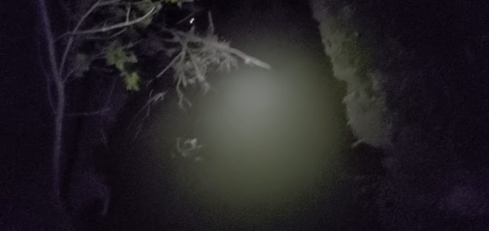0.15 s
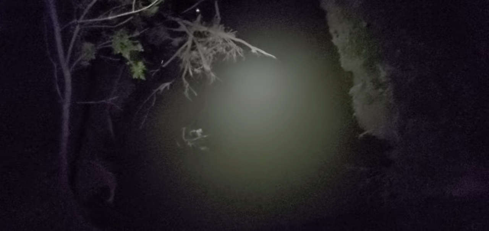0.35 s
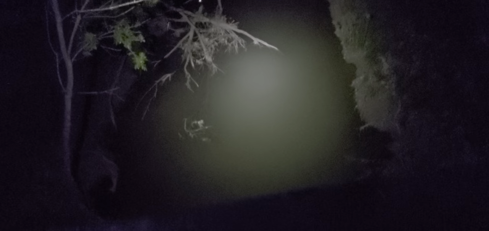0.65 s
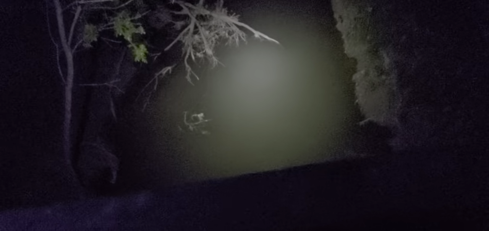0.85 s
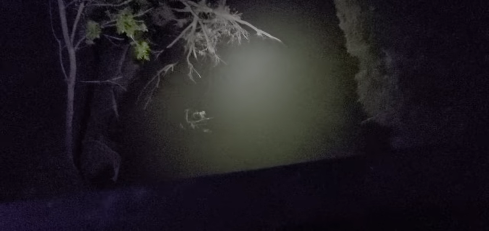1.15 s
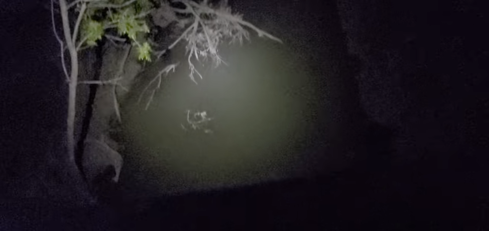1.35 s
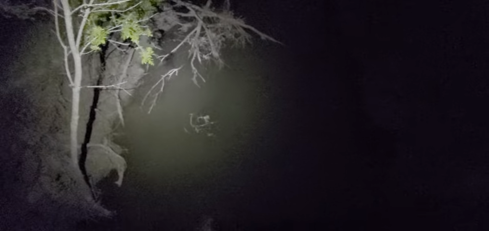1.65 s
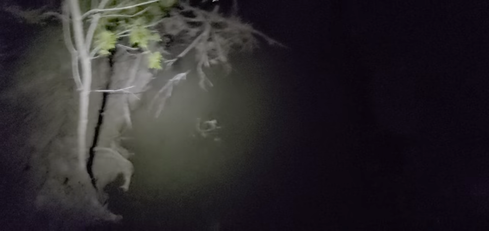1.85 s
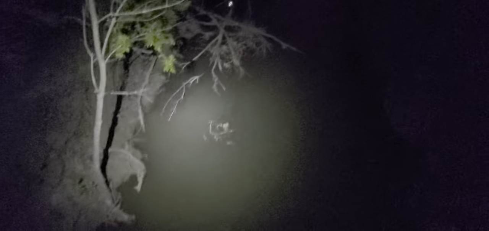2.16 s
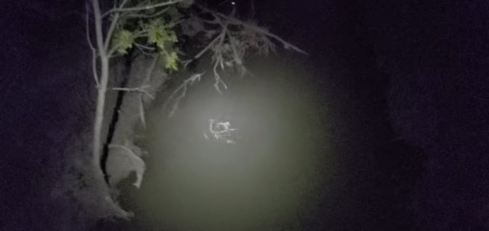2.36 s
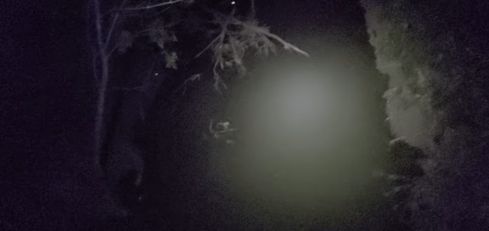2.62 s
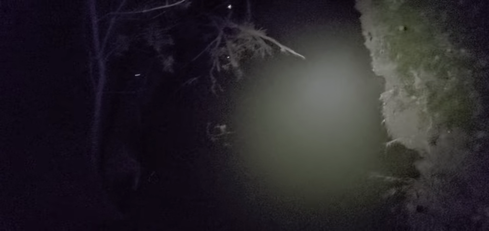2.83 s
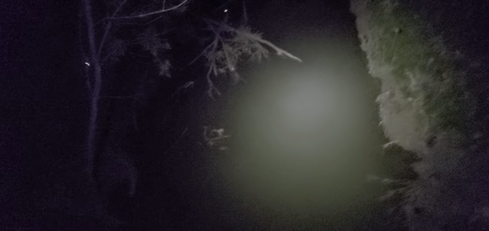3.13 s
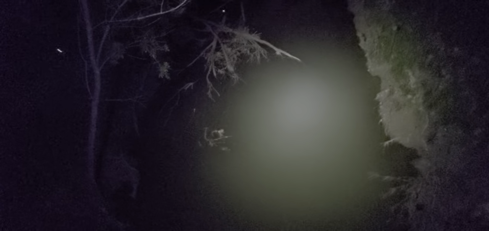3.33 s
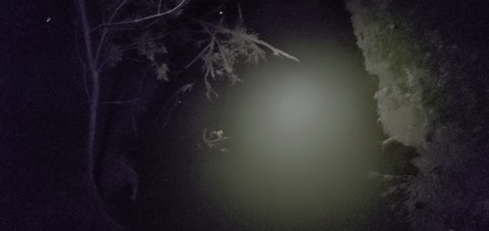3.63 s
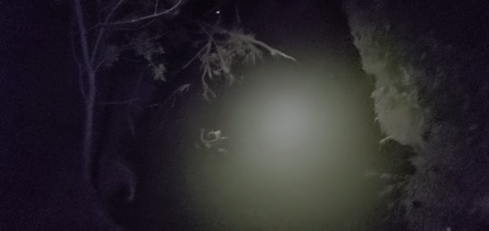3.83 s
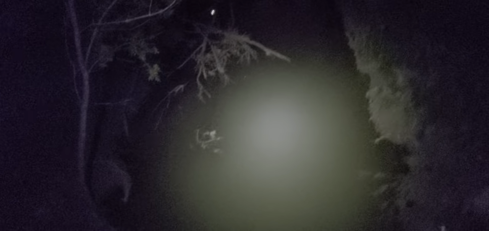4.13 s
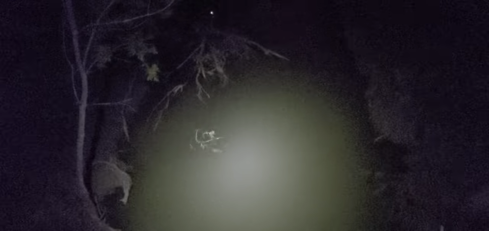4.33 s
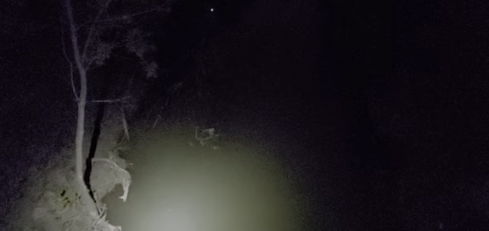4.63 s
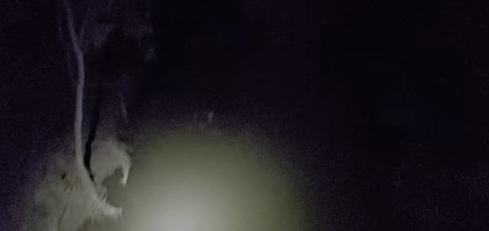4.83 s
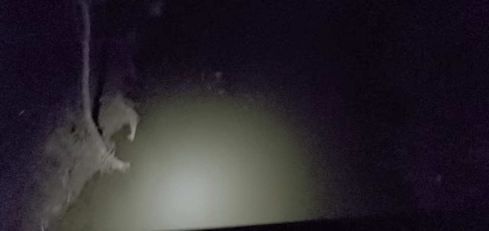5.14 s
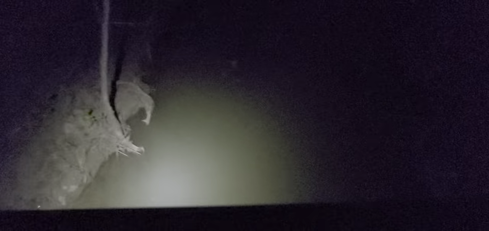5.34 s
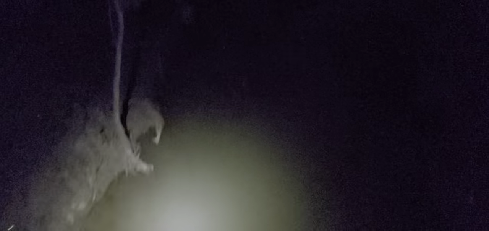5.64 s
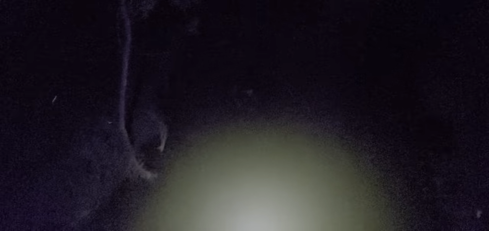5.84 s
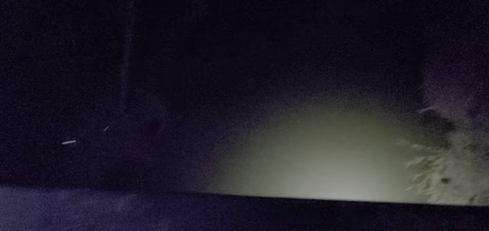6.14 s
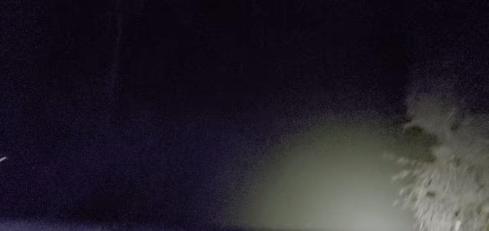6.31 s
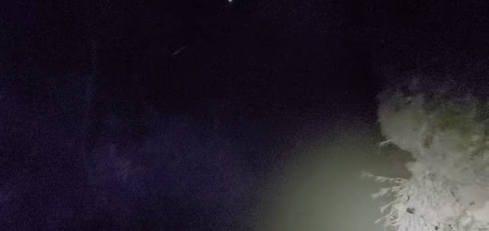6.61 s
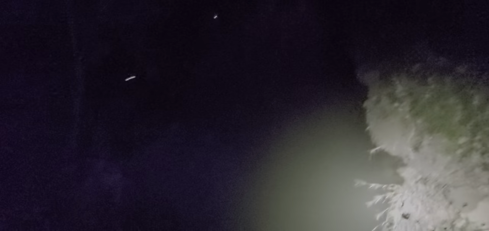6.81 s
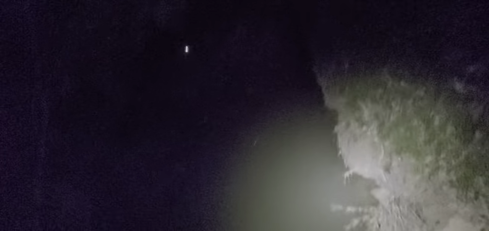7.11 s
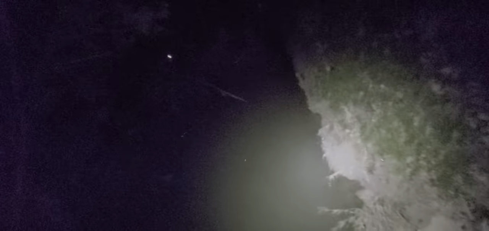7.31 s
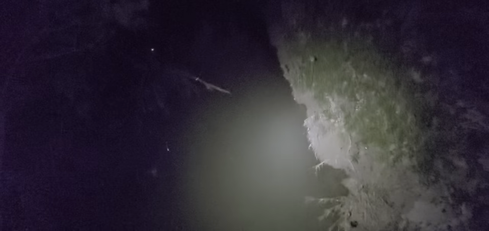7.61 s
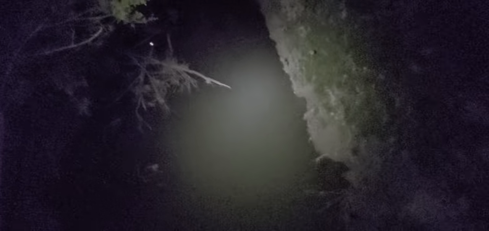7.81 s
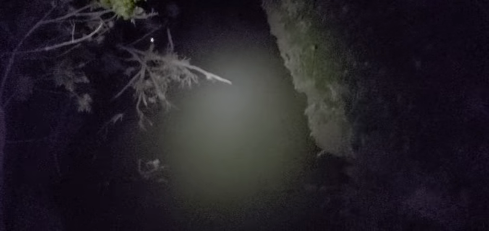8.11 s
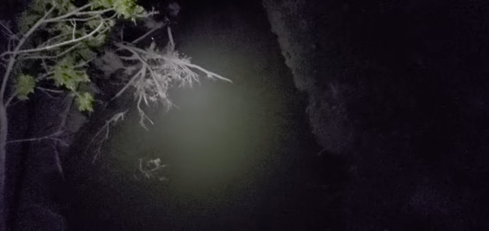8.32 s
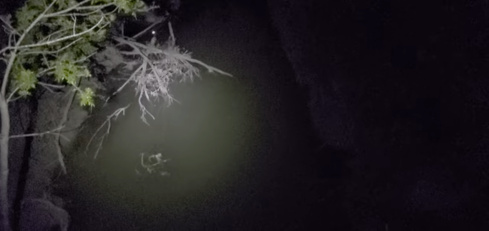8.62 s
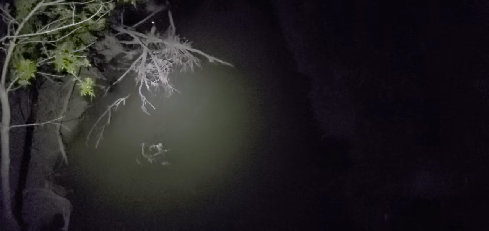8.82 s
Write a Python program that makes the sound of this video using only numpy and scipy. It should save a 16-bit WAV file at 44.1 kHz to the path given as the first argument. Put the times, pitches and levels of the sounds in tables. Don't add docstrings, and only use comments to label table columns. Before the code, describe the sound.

Night insects and small frogs chorus densely by a dark creek above faint low rumble, while a hand-held camera ticks, scrapes and clicks sharply.

```python
import sys
import numpy as np
from scipy import signal
from scipy.fft import rfft, irfft, next_fast_len
from scipy.io import wavfile
from scipy.ndimage import uniform_filter1d, map_coordinates

SR = 44100
rng = np.random.default_rng(int(sys.argv[2]) if len(sys.argv) > 2 else 0)


def log_audio(samples):
    frames = np.atleast_2d(samples).T
    limited = np.clip(frames, -1, 1)
    pcm = np.round(limited * 32767).astype(np.int16)
    wavfile.write(sys.argv[1], SR, pcm)


def makeup_ratio(level_db):
    decades = np.asarray(level_db, float) / 20
    return 10 ** decades


N = 395136

# first stroke in seconds, last stroke in seconds.
CRICKET_RUNS = [(0.0139, 0.0139), (0.0558, 0.0724), (0.0866, 0.0866), (0.1019, 0.1943), (0.2256, 0.3202),
                (0.3537, 0.3892), (0.4224, 0.4224), (0.4371, 0.745), (0.7767, 0.7767), (0.8068, 0.8068),
                (0.8467, 0.8865), (0.9164, 0.9739), (1.0019, 1.0407), (1.071, 1.1324), (1.1478, 1.1674),
                (1.1826, 1.221), (1.2488, 1.2703), (1.2986, 1.6344), (1.6605, 1.6765), (1.7293, 1.7293),
                (1.7614, 1.8009), (1.8391, 1.9147), (1.9451, 1.9451), (1.9731, 2.3394), (2.3696, 2.5442),
                (2.5764, 2.6158), (2.6307, 2.6523), (2.6822, 2.7004), (2.7322, 2.7703), (2.8004, 2.8183),
                (2.8524, 2.9701), (3.0013, 3.041), (3.0709, 3.1667), (3.197, 3.2346), (3.265, 3.265),
                (3.3075, 3.3075), (3.3361, 3.377), (3.4041, 3.6785), (3.7105, 3.7281), (3.7438, 3.7646),
                (3.8056, 3.8238), (3.8492, 3.8695), (3.884, 3.884), (3.9088, 4.0644), (4.0952, 4.1534),
                (4.183, 4.2201), (4.2505, 4.2702), (4.299, 4.3385), (4.3685, 4.4089), (4.4387, 4.4584),
                (4.487, 4.526), (4.5555, 4.654), (4.669, 4.6909), (4.705, 4.705),
                (4.7202, 4.8178), (4.8474, 4.8477), (4.8727, 4.8927), (4.9218, 4.9611),
                      (4.9885, 5.0321), (5.0642, 5.1427), (5.171, 5.2503), (5.2786, 5.2786),
                      (5.3038, 5.3217), (5.337, 5.4348), (5.4647, 5.507), (5.5387, 5.5821),
                      (5.6128, 5.6493), (5.686, 5.686), (5.7145, 5.7369), (5.7675, 5.7675), (5.798, 5.817),
                      (5.8478, 5.9635), (5.9951, 6.034), (6.059, 6.0598), (6.104, 6.184), (6.2146, 6.2523),
                      (6.2851, 6.4024), (6.431, 6.4542), (6.4943, 6.4943), (6.509, 6.6446),
                      (6.6774, 6.7718), (6.8096, 6.8482), (6.88, 6.8794), (6.9102, 6.9756),
                      (7.0056, 7.1366), (7.1655, 7.2044), (7.2484, 7.2484), (7.291, 7.3095),
                      (7.3401, 7.3401), (7.3788, 7.5194), (7.5461, 7.5461), (7.5788, 7.5788),
                      (7.6064, 7.6064), (7.6371, 7.7332), (7.7617, 7.8554), (7.8848, 7.9808),
                      (8.0102, 8.0479), (8.0767, 8.2292), (8.2611, 8.2986), (8.329, 8.3861),
                      (8.4191, 8.4584), (8.4846, 8.4846), (8.5195, 8.5195), (8.5431, 8.5833),
                      (8.6115, 8.6535), (8.6822, 8.7987), (8.8293, 8.8681), (8.896, 8.8967),
                      (8.9204, 8.9579)]
# time in seconds, level in dB, left over right in dB.
CRICKET_LEVEL = [(0, -57, -7), (1.66, -53, -5), (1.72, -70, -11), (1.82, -56, -6), (3.72, -54.5, -8.5),
                 (3.8, -66, -3), (3.93, -54.5, -7), (5, -56.5, -3.5), (5.9, -59.5, -17), (6.8, -58, -4),
                 (7.5, -49, -2), (7.58, -63, 1), (7.72, -52, 0), (8.96, -53, -2.5)]
STROKE_S = .0194

# start in seconds, peak in dB, pitch in Hz, low mode in dB.
FIRST_CALLS = [(0.0313, -46, 3560, -26), (0.1037, -55, 3600, -28), (0.17, -45.5, 3570, -20),
               (0.2473, -47.5, 3600, -17), (0.2843, -50, 3500, -16), (0.3691, -58, 3570, -20),
               (0.4439, -48, 3380, -23), (0.4978, -43.5, 3530, -14), (0.6619, -51, 3650, -15),
               (0.6943, -49, 3600, -9), (0.7297, -41, 3550, -17), (0.8056, -32, 3440, -13.5),
               (0.8719, -47, 3540, -22), (0.9158, -49, 3500, -26), (0.9542, -49, 3500, -16),
               (1.1024, -44, 3680, -13.5), (1.2027, -47.5, 3530, -21), (1.293, -41, 3490, -23),
               (1.3418, -45.5, 3640, -28), (1.4556, -44, 3570, -17), (1.4935, -46, 3620, -19),
               (1.5319, -49.5, 3600, -13), (1.6092, -41, 3470, -20), (1.7794, -49, 3600, -23),
               (1.8213, -44, 3660, -11.5), (1.926, -39, 3560, -21), (2.0213, -37, 3530, -22),
               (2.0602, -44, 3380, -19), (2.1146, -48, 3530, -19), (2.172, -51, 3620, -13),
               (2.2258, -43.5, 3420, -12.5), (2.3216, -41, 3500, -23), (2.4159, -49.5, 3330, -12),
               (2.5346, -56, 3560, -19), (2.5731, -46.5, 3610, -12), (2.6269, -52, 3440, -27),
               (2.6708, -42.5, 3510, -14), (2.7511, -48.5, 3480, -24), (2.8624, -52, 3390, -23),
               (2.9277, -43.5, 3400, -15), (3.0634, -35, 3530, -16), (3.2216, -42, 3500, -22),
               (3.3368, -45, 3470, -12.5), (3.4994, -42, 3470, -23), (3.5523, -48.5, 3460, -12),
               (3.6192, -48.5, 3500, -18), (3.7145, -61, 3540, -20), (3.7843, -43.5, 3630, -12.5),
               (3.9045, -41, 3550, -22), (4.0332, -42.5, 3480, -16)]
# start in seconds, peak in dB, pitch in Hz, low mode in
# dB.
MIDDLE_FROG_CALLS = [(4.1353, -41.5, 3540, -19.5), (4.2001, -45, 3510, -24), (4.2545, -44, 3720, -17),
                     (4.3014, -39, 3360, -19), (4.465, -40, 3550, -20), (4.5169, -46, 3440, -25),
                     (4.5623, -43.5, 3410, -23), (4.696, -45, 3430, -14), (4.7479, -34, 3530, -12.5),
                     (4.8506, -39, 3510, -17), (4.9594, -66, 3730, -19), (5.0337, -41, 3430, -20),
                     (5.0986, -41, 3460, -21), (5.1998, -44.5, 3550, -18), (5.2447, -49, 3580, -13),
                     (5.3455, -40, 3590, -14), (5.4687, -53, 3350, -17), (5.5316, -47.5, 3400, -22),
                     (5.6014, -57, 3440, -20), (5.6403, -40, 3570, -14), (5.7501, -47, 3590, -19),
                     (5.8708, -51, 3420, -24), (5.9082, -60, 3400, -17), (5.998, -44, 3610, -15),
                     (6.1681, -47, 3560, -14), (6.4834, -45, 3560, -14), (6.683, -48.5, 3770, -19),
                     (6.8157, -41.5, 3580, -15.5), (6.9169, -45.5, 3520, -14), (6.9908, -43.5, 3600, -27),
                     (7.11, -52.5, 3580, -20), (7.1968, -40, 3620, -25)]
# start in seconds, peak in dB, pitch in Hz, low mode in dB.
LAST_FROG_CALLS = [(7.3257, -45.5, 3670, -14), (7.4574, -44, 3630, -18), (7.6135, -41, 3570, -25),
                   (7.7617, -47, 3620, -23), (7.7956, -47, 3700, -16), (7.8615, -48, 3560, -19),
                   (7.9104, -46, 3580, -24), (8.0226, -50, 3640, -21), (8.059, -47, 3590, -19),
                   (8.1204, -41.5, 3580, -21), (8.2855, -48.5, 3580, -23), (8.3673, -45, 3570, -20),
                   (8.4836, -42.5, 3540, -21), (8.6287, -51, 3500, -25), (8.6632, -43.5, 3630, -26),
                   (8.7116, -52, 3530, -23), (8.7784, -47, 3450, -20), (8.8298, -44.5, 3560, -16)]
# time in seconds, level in dB, left over right in dB.
BANK_LEVEL = [
    (0.0, -62.5, -8),
    (1.65, -55, -7.0),
    (5.37, -57, -6),
    (6.29, -59.5, -2),
    (7.19, -53.5, -7),
    (7.83, -59.5, -0.5),
    (8.96, -57, -3),
]
# frequency in Hz, gain in dB.
VOCAL_SAC = [(1800, -30), (2500, -2), (3000, 1.5), (4100, 7.5), (5500, -26)]

# time in seconds, level in dB.
KATYDID_LEVEL = [
    (0, -71),
    (4.5, -71),
    (5.2, -71.5),
    (5.7, -77),
    (6.4, -76.5),
    (6.9, -67.5),
    (7.8, -73.5),
    (8.96, -74.5),
]
# share of the cycle, level in dB.
WING_SCRAPES = [
    (0, 8.5),
    (0.301, -6),
    (0.629, 7),
    (0.801, -10),
]
# frequency in Hz, gain in dB.
WING_MIRROR = [(8000, -5), (9500, 6.5), (10400, -1.5), (11000, 2.5), (11600, 2.5), (12200, -0.5),
               (13000, 4), (13600, -24)]
# frequency in Hz, width in Hz, level in dB.
WING_RESONANCES = [(9700, 250, -9), (10300, 160, -7), (10750, 200, -4), (11480, 210, -1),
                   (12100, 190, -5.5), (12650, 180, -4)]

# start in seconds, hold in seconds, body in dB, sheen in dB.
CLOTH_RUSTLES = [(1.565, .03, -85, -78), (1.835, 0.059, -68, -76), (2.09, .02, -68, -82),
                 (2.19, 0.12, -64.5, -83), (2.625, 0.048, -66, -66), (3.04, 0.037, -59.5, -70),
                 (3.225, 0.019, -63, -70), (3.3, 0.35, -71, -75), (3.625, 0.017, -65, -69),
                 (3.89, .04, -77, -77), (4.335, .03, -69, -86), (4.76, 0.14, -74, -87),
                 (6.05, .04, -78, -85), (6.7, 0.39, -78, -91), (7.12, 0.16, -71, -94),
                 (7.35, 0.21, -65.5, -86), (7.58, 0.26, -68.5, -87)]
# frequency in Hz, density in dB per Hz.
CLOTH_BODY = [(800, 1), (3000, -9.5), (6200, -2.5), (8000, -12), (11000, -22)]
# frequency in Hz, density in dB per Hz.
CLOTH_SHEEN = [(6000, -6), (9500, 2), (15500, 3)]
# start in seconds, hold in seconds, hiss in dB, scrape in dB.
THUMB_RUBS = [(.805, 0.0071, -81, -53.5), (1.835, 0.053, -91, -52), (1.93, 0.15, -71, -60.5),
              (4.77, 0.043, -76, -55), (4.885, 0.028, -61, -53.5), (5.25, 0.1, -60.5, -50.5),
              (5.39, 0.089, -47.5, -44), (5.52, 0.17, -63.5, -62), (5.75, 1.1, -71, -62.5),
              (6.04, 0.076, -66, -58), (6.64, 0.06, -60.5, -58), (6.765, .03, -70, -66),
              (7.15, 0.081, -53.5, -80), (7.28, 0.26, -58, -60), (7.25, 0.015, -57, -45.5),
              (7.335, 0.029, -48, -46), (7.42, 0.034, -54, -51.5), (7.52, 0.31, -60.5, -81),
              (7.83, 0.068, -70, -85), (7.635, 0.022, -67, -52.5), (8.515, 0.015, -63, -57)]
# frequency in Hz, density in dB per Hz.
SKIN_HISS = [(3000, 1.5), (7000, -12), (10500, -4), (12500, 0), (15500, -4)]
# frequency in Hz, density in dB per Hz.
THUMB_SCRAPE = [(60, 19), (150, 8.5), (500, -1), (1500, -8), (4000, -15.5), (8000, -29.5)]
# time in seconds, level in dB, pitch in Hz.
FIBRE_PRICKS = [(1.5449, -66, 12000), (2.105, -60, 11000), (2.222, -64, 11000), (4.7128, -60, 11000),
                (5.379, -51, 12600), (5.725, -71, 14000), (5.785, -67, 11500), (5.9995, -57.5, 9900),
                (6.059, -56, 9000), (6.068, -55.5, 10700), (6.178, -63, 9000), (7.914, -71, 13500)]
# share of the pitch, width in Hz, level in dB.
GRILLE_MODES = [(1, 2600, 2.5), (1.3, 2500, -6)]

# time in seconds, snap in dB, knock in dB, thump in dB, left over right in dB.
CASE_TICKS = [(0.6829, -84, -37, -46.5, -9), (0.805, -36, -27, -36, -34), (1.944, -45.5, -60, -44, -22),
              (2.0207, -41.5, -66, -49.5, -27), (3.0416, -63, -70, -64, 2), (3.222, -53, -71, -70, -13),
              (4.3263, -54, -68, -74, -14), (4.348, -52, -56, -50.5, -18), (4.713, -70, -58, -51.5, 0),
              (4.814, -66, -69, -48.5, -13), (4.8719, -54, -38, -41.5, -12), (5.3764, -70, -63, -38.5, -30),
              (6.1748, -73, -49, -68, 2.5), (6.6458, -71, -73, -44, -28), (6.7671, -57, -40, -62, -13),
              (7.247, -7.5, -24, -29, -46), (7.6401, -59, -38, -51.5, -21), (7.9912, -64, -41, -46, -26),
              (8.5176, -49, -58, -44.5, -23)]
# time in seconds, knock in dB.
GRIP_CREAKS = [
    (7.8008, -45),
    (7.8156, -43),
    (7.833, -55),
    (7.849, -43),
    (7.87, -47),
    (7.9066, -40.5),
]
# frequency in Hz, width in Hz, level in dB.
CASE_MODES = [(1160, 1360, 0), (2790, 4240, 5.5), (6550, 2600, -12.5), (11400, 3300, -5)]

# start in seconds, level in dB, pitch in Hz, length in
# seconds, left over right in dB.
GURGLES_AND_CALLS = [
    (1.813, -62.5, 1230, 0.075, 23),
    (1.821, -55.5, 540, 0.076, 9),
    (1.954, -48, 522, 0.052, 6),
    (1.95, -61, 780, 0.048, 5),
    (6.838, -73, 2290, 0.13, 2),
    (6.966, -76, 2320, 0.17, 0),
    (7.08, -70, 2300, 0.14, -2),
    (7.262, -71, 2320, 0.081, -6),
]

# time in seconds, level in dB.
TRAFFIC_LEVEL = [
    (0.0, -53.5),
    (3.77, -51.5),
    (7.29, -50.5),
    (8.96, -52.5),
]
# frequency in Hz, density in dB per Hz.
RUMBLE = [(25, -61), (46, -3), (95, -3.5), (150, -10), (378, -19), (800, -25), (2500, -43.5), (3250, -104)]
# frequency in Hz, likeness from 0 to 1.
RUMBLE_ALIKE = [(60, 0.91), (260, 1), (700, 0.39), (1400, 0.15), (2500, 0.063)]
# frequency in Hz, density in dB per Hz.
FAR_CHORUS = [(2000, -55), (2700, -35), (3500, -18), (4000, -32), (4500, 7), (5000, 0.5), (5600, -23.5),
              (6500, -88)]
# frequency in Hz, density in dB per Hz.
FAR_BUZZ = [(5400, -1), (6500, 8.5), (7500, 1), (8000, 4)]
# frequency in Hz, density in dB per Hz.
MICROPHONE_HISS = [(5000, -20), (7900, -14), (9000, 12), (15500, 23)]
RUMBLE_LAG_S = -20 / SR

TOP_HZ = 15780


def cricket():
    middles = stroke_times()
    chance = rng.standard_normal((len(middles), 3))
    t, length = np.arange(900) / SR, .0115
    start_hz = 4520 + 30 * chance[:, :1]
    fall = 480 * length / 3.16 * (t / length) ** 3.48
    phase = 2 * np.pi * (start_hz * t - fall) + 3 * chance[:, 1:2]
    swell = np.sin(np.pi * np.clip(t / length, 0, 1) ** 0.93).clip(0)
    tone = np.sin(phase) + makeup_ratio(-17) * np.sin(2 * phase)
    wing_strokes = makeup_ratio(0.84 * chance[:, 2:]) * swell * tone
    level_db, pan_db = curves(CRICKET_LEVEL)
    song = makeup_ratio(level_db - 7) * unit(placed(middles - length / 2, wing_strokes))
    return heard(song, pan_db, lag=.00003, wet_db=-0.15, t60=0.41)


def stroke_times():
    runs = CRICKET_RUNS
    return np.concatenate([np.linspace(a, b, round((b - a) / STROKE_S) + 1) for a, b in runs])


def frogs():
    level_db, pan_db = curves(BANK_LEVEL)
    count = 650
    chance = rng.random((count, 3))
    crowd_hz = 3620 - 450 * chance[:, 2] ** 2.2
    crowd = np.c_[chance[:, 0] * N / SR, 5 * chance[:, 1], crowd_hz, np.full(count, -19)]
    far = makeup_ratio(level_db - 8.5 + 1.8 * wobble(7)) * unit(rattles(crowd, spacing=.007, fade_db=1.5))
    calls = np.r_[FIRST_CALLS, MIDDLE_FROG_CALLS, LAST_FROG_CALLS]
    calls[:, 1] = np.minimum(calls[:, 1], -41)
    near = makeup_ratio(-5) * rattles(calls, spacing=0.0073, fade_db=1.36)
    near = heard(near, pan_db, lag=-.0001, wet_db=-4, t60=0.32)
    far = heard(far, pan_db, lag=-.00012, wet_db=4, t60=0.44)
    return filtered(near + far, lambda hz: makeup_ratio(along(VOCAL_SAC, hz)))


def rattles(calls, spacing, fade_db):
    s, db, hz, low_db = np.transpose(calls)[:, :, None]
    chance = rng.standard_normal((len(calls), 4, 8))
    order = np.arange(8)
    gaps = spacing * np.exp(.25 * chance[:, 0] + .15 * chance[:, 3, :1])
    starts = s + np.cumsum(gaps, axis=1) - gaps[:, :1]
    sizes = makeup_ratio(db + 2.36 * chance[:, 1] - fade_db * order)
    pitch = (hz * (1 + 0.021 * chance[:, 2] - 0.0015 * order)).reshape(-1, 1)
    t = np.arange(260) / SR
    low_gain = makeup_ratio(np.repeat(low_db, 8)[:, None] + 9)
    ring = np.sin(2 * np.pi * pitch * t)
    ring = ring + low_gain * np.sin(2 * np.pi * 0.853 * pitch * t)
    ring = ring + makeup_ratio(-12.5) * np.sin(2 * np.pi * 1.11 * pitch * t)
    pulse = (t / 0.001) * np.exp(1 - t / 0.0013)
    return placed(starts.ravel(), sizes.reshape(-1, 1) * pulse * ring)


def katydid():
    cycles, cycles_per_s = 620, 68.35
    share, db = np.transpose(WING_SCRAPES)
    starts = ((np.arange(cycles)[:, None] + share + .67) / cycles_per_s).ravel()
    chance = rng.standard_normal((len(starts), 2))
    t, length = np.arange(120) / SR, .0022
    phase = 2 * np.pi * (13200 * t - 4500 * t * t / length / 2) + 1.3 * chance[:, :1]
    swell = np.sin(np.pi * np.clip(t / length, 0, 1)) ** 0.1
    scrape = swell * makeup_ratio(-6 * t / length) * np.sin(phase)
    sizes = makeup_ratio(np.tile(db, cycles)[:, None] + 1.4 * chance[:, 1:])
    buzz = unit(placed(starts, sizes * scrape))

    def wing(hz):
        modes = 0.85
        for mode_hz, width, mode_db in WING_RESONANCES:
            modes = modes + makeup_ratio(mode_db) / (1 + (2 * (hz - mode_hz) / width) ** 2)
        return makeup_ratio(along(WING_MIRROR, hz)) * modes

    buzz = makeup_ratio(curves(KATYDID_LEVEL)[0] - 14) * unit(filtered(buzz, wing))
    return heard(buzz, pan_db=-29.5, lag=0.00026, wet_db=2.5, t60=0.21)


def hands():
    body, sheen = handling(CLOTH_RUSTLES, rise_db_s=450, fall_db_s=251)
    fibres = makeup_ratio(1.3 * wobble(90))
    cloth = body * makeup_ratio([[3], [4]]) * patchy(noise(CLOTH_BODY), patchy_db=3.5)
    cloth = cloth + sheen * makeup_ratio([[1.5], [-4]]) * noise(CLOTH_SHEEN)
    hiss, scrape = handling(THUMB_RUBS, rise_db_s=480, fall_db_s=252)
    slip = wobble(70)
    skin = patchy(noise(SKIN_HISS, channels=1)[0], patchy_db=2.5)
    sizzle = filtered(skin, lambda hz: 1 / (1 + (12700 / (hz + 1)) ** 12))
    firmness = hiss / makeup_ratio(-49)
    skin = skin + sizzle * (1.36 * firmness ** 0.74 - 1)
    hiss = hiss * makeup_ratio(3.5 + 0.48 * slip + 1.5 * wobble(25)) * skin
    scrape = scrape * makeup_ratio(6.5 + 2.5 * slip) * noise(THUMB_SCRAPE, channels=1)[0]
    return fibres * cloth + np.outer([makeup_ratio(-67), 1], hiss + scrape)


def handling(rows, rise_db_s, fall_db_s):
    s, hold, *levels_db = np.transpose(rows)[:, :, None]
    t = np.arange(0, N, 64) / SR
    shape_db = -rise_db_s * np.clip(s - t, 0, None) - fall_db_s * np.clip(t - s - hold, 0, None)
    shape_db = shape_db - 2.5 * np.clip(2 * (t - s) / hold - 1, -1, 1) ** 2
    gains = [np.sqrt(np.sum(makeup_ratio(db + shape_db) ** 2, axis=0)) for db in levels_db]
    return [np.interp(np.arange(N) / SR, t, gain) for gain in gains]


def pricks():
    s, db, hz = np.transpose(FIBRE_PRICKS)[:, :, None]
    t = np.arange(200) / SR
    ring = 0
    for share, width, level_db in GRILLE_MODES:
        decay = t * width * np.exp(-np.pi * width * t)
        ring = ring + makeup_ratio(level_db) * decay * np.sin(2 * np.pi * share * hz * t)
    return placed(s[:, 0] + .001, makeup_ratio(db + 33.5) * ring) * makeup_ratio([[-12], [0]])


def ticks():
    creaks = [(s, db - 18, db, db - 10, -27) for s, db in GRIP_CREAKS]
    s, snap_db, knock_db, thump_db, pan_db = np.transpose(CASE_TICKS + creaks)[:, :, None]
    t = np.arange(1500) / SR
    (knock_hz, knock_width, _), *shell = CASE_MODES
    push = (1 - np.exp(-t / .00012)) ** 2
    snap = -sum(makeup_ratio(db) * np.exp(-np.pi * width * t) * np.cos(2 * np.pi * hz * t) for hz, width, db in shell)
    knock = push * np.exp(-np.pi * knock_width * t) * np.sin(2 * np.pi * knock_hz * t)
    thump = push * makeup_ratio(-60 * t / 0.011) * np.sin(2 * np.pi * 190 * t + 0.78)
    tick = makeup_ratio(thump_db + 18.5) * thump + makeup_ratio(snap_db + 11) * snap + makeup_ratio(knock_db + 13) * knock
    left = placed(s[:, 0] + 0.00055, tick * makeup_ratio(1.3 * pan_db))
    right = placed(s[:, 0] + 0.00124, tick)
    return filtered(np.array([left, right]), lambda hz: makeup_ratio(-np.clip(hz - 12000, 0, None) / 500))


def creek():
    s, db, hz, length, pan_db = np.transpose(GURGLES_AND_CALLS)[:, :, None]
    t = np.arange(6000) / SR
    churn = rng.standard_normal((len(s), 2, len(t)))
    churn = uniform_filter1d(uniform_filter1d(churn, size=300), size=200)
    ring = unit(churn[:, 0] * np.sin(2 * np.pi * hz * t) + churn[:, 1] * np.cos(2 * np.pi * hz * t))
    swell = np.sin(np.pi * np.clip(t / length, 0, 1)).clip(0) ** 0.66
    plop = makeup_ratio(db) * swell * ring
    return np.array([placed(s[:, 0], plop * makeup_ratio(side * pan_db / 2)) for side in (1, -1)])


def night():
    own_db = 1.2 * np.array([wobble(9), wobble(9)])
    pair = noise(RUMBLE) * makeup_ratio(own_db + .6 * wobble(2.5))

    def mid_side(hz):
        turn = np.arccos(np.clip(along(RUMBLE_ALIKE, hz), 0, 1)) / 2
        return np.array([np.cos(turn), np.sin(turn)])

    mid, side = filtered(pair, mid_side)
    left = filtered(mid + side, lambda hz: np.exp(-2j * np.pi * hz * RUMBLE_LAG_S))
    rumble = makeup_ratio(curves(TRAFFIC_LEVEL)[0] + 2.5) * np.array([left, mid - side])
    chorus = makeup_ratio([[-66], [-64]]) * makeup_ratio(3.3 * wobble(4.1)) * noise(FAR_CHORUS)
    hiss = makeup_ratio([[-83], [-90]]) * noise(MICROPHONE_HISS)
    buzz = makeup_ratio(curves(KATYDID_LEVEL)[0] + [[-28], [-6]]) * noise(FAR_BUZZ, channels=1)
    return rumble + chorus + hiss + buzz


def heard(x, pan_db, lag, wet_db, t60):
    t = np.arange(SR // 4) / SR
    tails = rng.standard_normal((2, len(t))) * makeup_ratio(-60 * t / t60) * (t > .003)
    echoes = signal.fftconvolve(x[None], tails / np.linalg.norm(tails[0]), axes=1)[:, :N]
    n = np.arange(N)
    echoes = np.array([np.interp(n + .003 * SR * wobble(2.5), n, e) for e in echoes])
    direct = np.array([np.roll(x, round(lag * SR)), x])
    return (direct + makeup_ratio(wet_db) * echoes) * makeup_ratio(np.outer([.5, -.5], pan_db))


def noise(spectrum, channels=2):
    closed = [(spectrum[0][0] / 2, -120)] + list(spectrum) + [(spectrum[-1][0] * 2, -120)]
    return unit(filtered(rng.standard_normal((channels, N)), lambda hz: makeup_ratio(along(closed, hz))))


def patchy(x, patchy_db):
    z = signal.stft(x, nperseg=256)[2]
    field = rng.standard_normal(z.shape[-2:])
    field = uniform_filter1d(uniform_filter1d(field, size=7, axis=0), size=14, axis=1)
    return unit(signal.istft(z * makeup_ratio(patchy_db * unit(field)), nperseg=256)[1][..., :N])


def placed(starts, shapes):
    at = np.round(starts * SR).astype(int)[:, None] + np.arange(shapes.shape[1])
    return np.bincount(at.clip(0, N).ravel(), shapes.ravel(), N + 1)[:N]


def curves(rows):
    s, *cols = np.transpose(rows)
    return [np.interp(np.arange(N) / SR, s, c) for c in cols]


def wobble(rate):
    return map_coordinates(rng.standard_normal(int(N * rate / SR) + 4), [np.arange(N) * rate / SR])


def filtered(x, response):
    m = next_fast_len(N + 8192)
    return irfft(rfft(x, m) * response(np.fft.rfftfreq(m, 1 / SR)), m)[..., :N]


def along(points, hz):
    f, v = np.transpose(points)
    return np.interp(np.log(hz + 1), np.log(f), v)


def unit(x):
    return x / np.sqrt(np.mean(x ** 2) + 1e-20)


def scene():
    steady = cricket() + frogs() + katydid() + night() + creek() + hands() + pricks()
    return filtered(steady, lambda hz: hz < TOP_HZ) + ticks()


def top_cut(x):
    return signal.sosfilt(signal.butter(12, 17010, fs=SR, output="sos"), x)


def record(dry):
    held = dry / (1 + np.abs(dry / .8) ** 6) ** (1 / 6)
    mix = filtered(held, lambda hz: makeup_ratio(-np.clip(hz - TOP_HZ, 0, None) / 12))
    return top_cut(mix)


dry = scene()
out = record(dry)
log_audio(out)
```